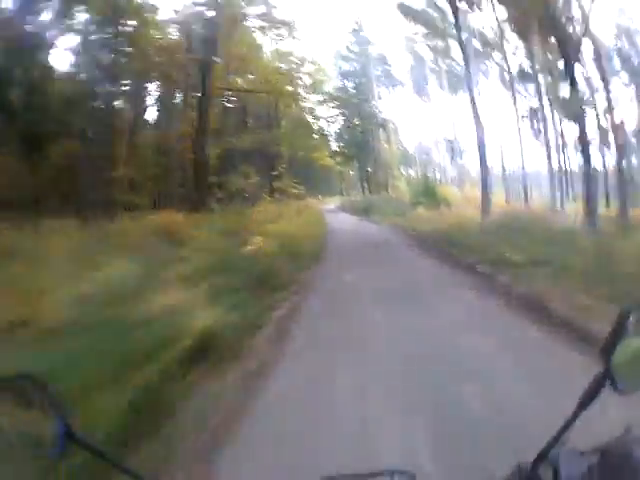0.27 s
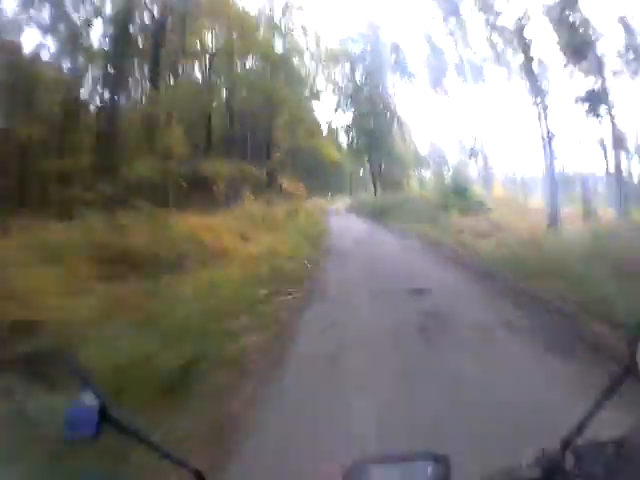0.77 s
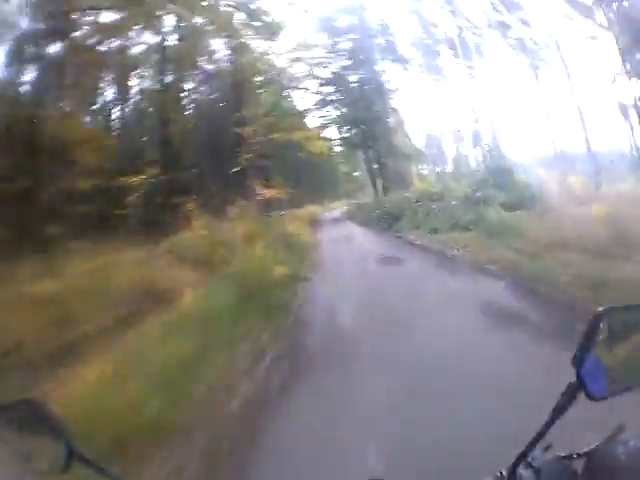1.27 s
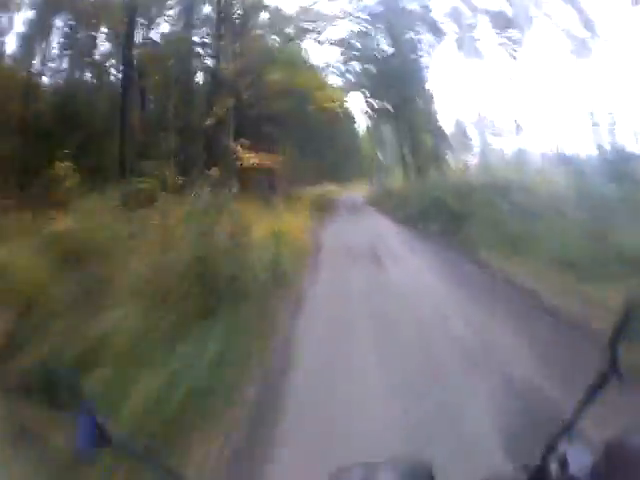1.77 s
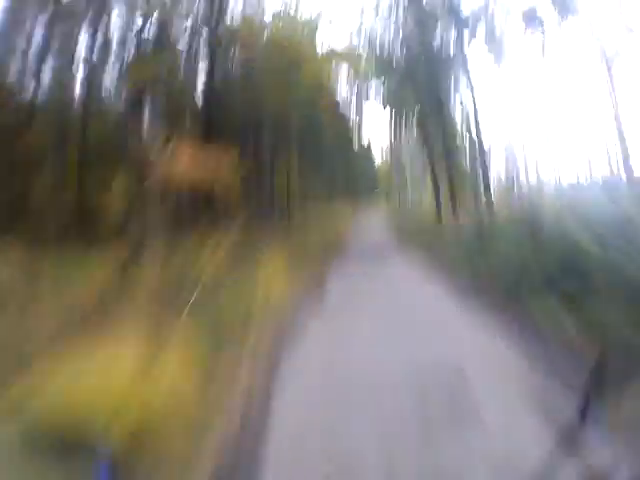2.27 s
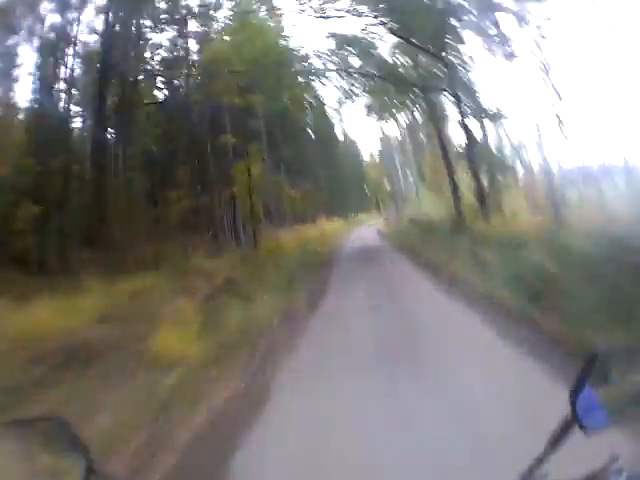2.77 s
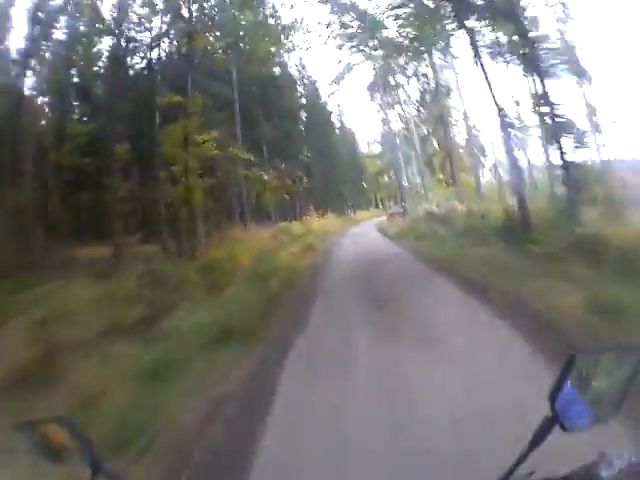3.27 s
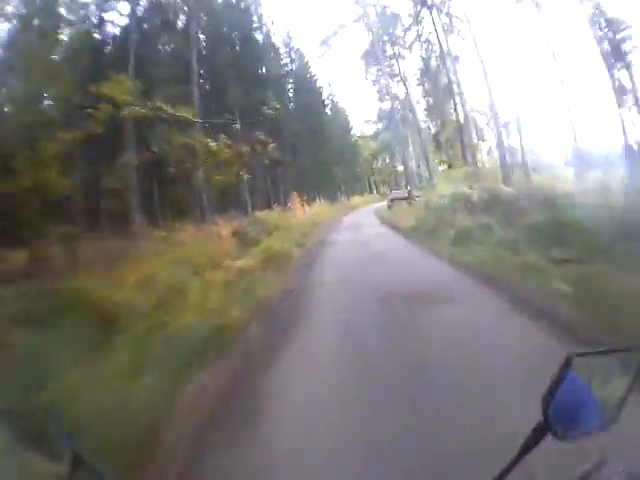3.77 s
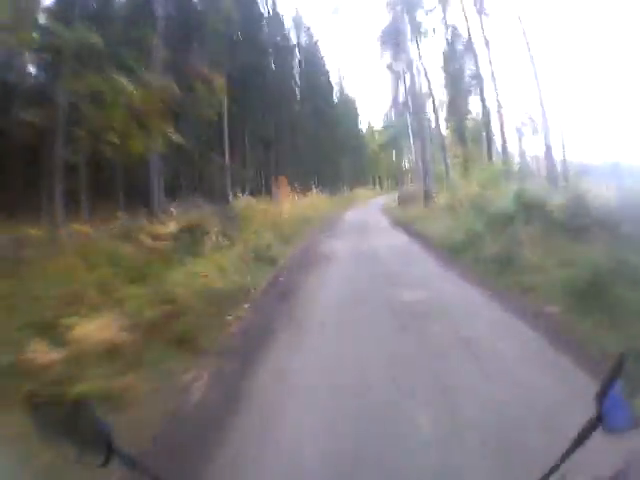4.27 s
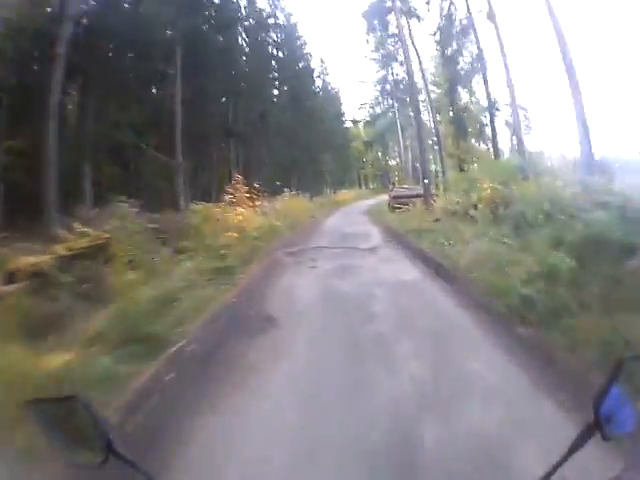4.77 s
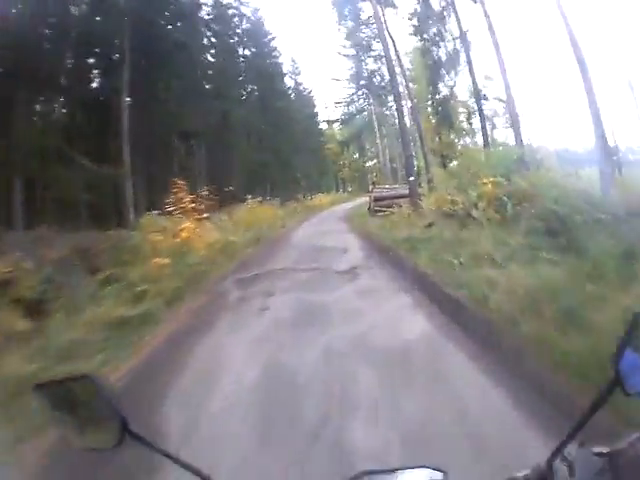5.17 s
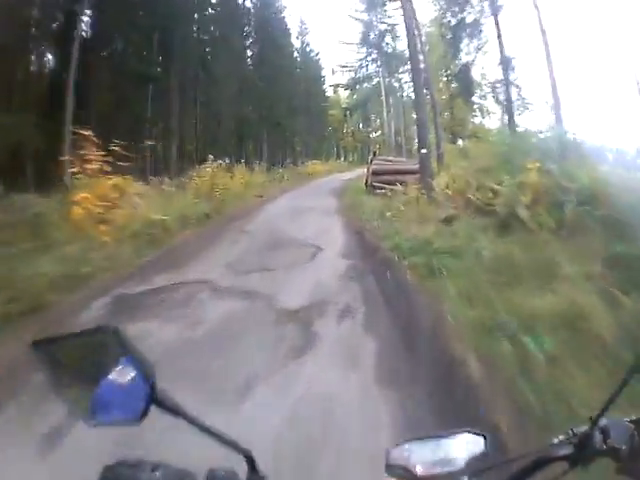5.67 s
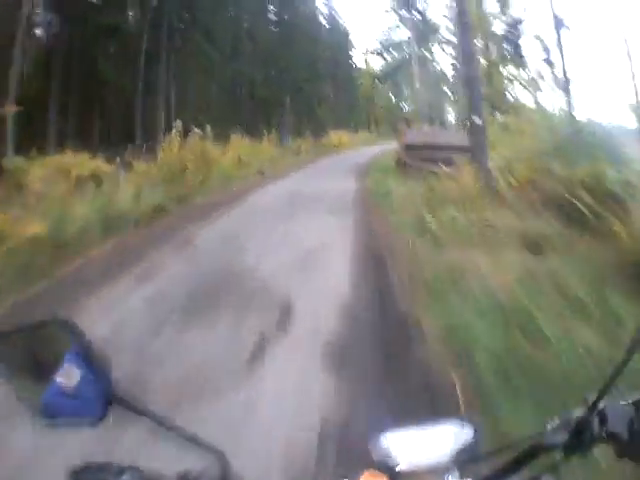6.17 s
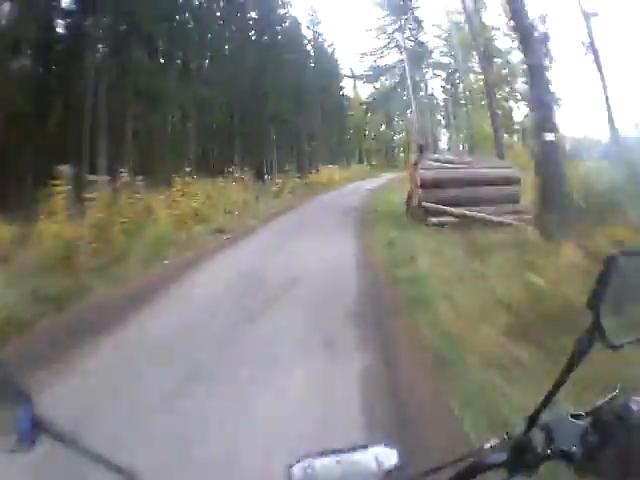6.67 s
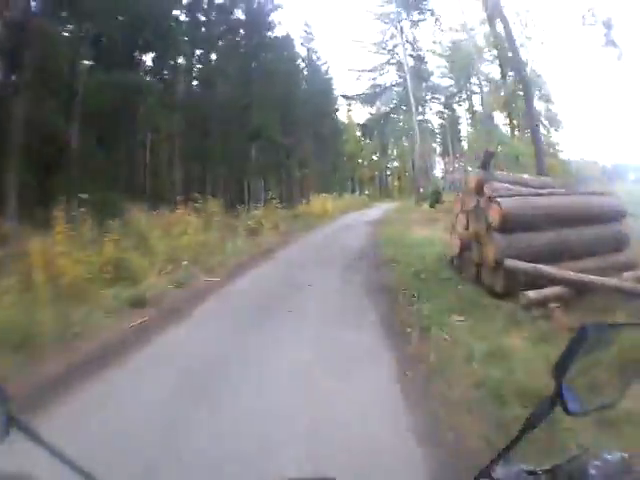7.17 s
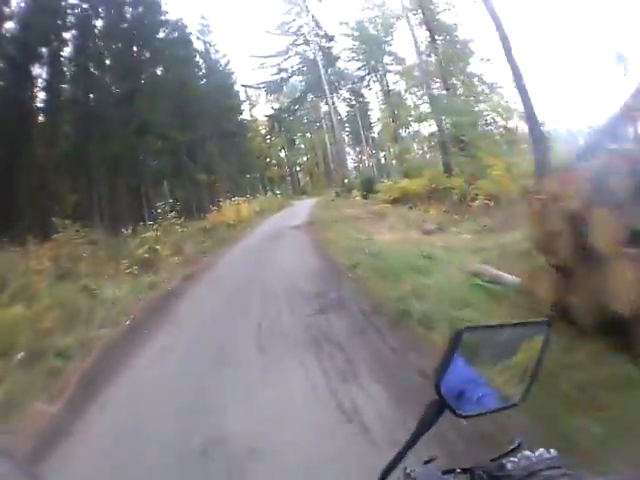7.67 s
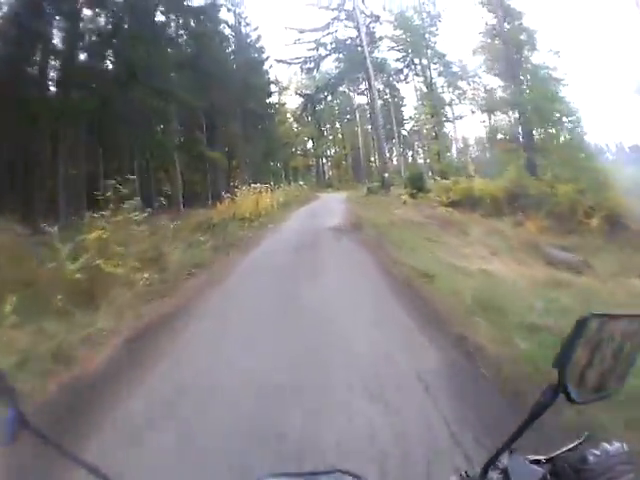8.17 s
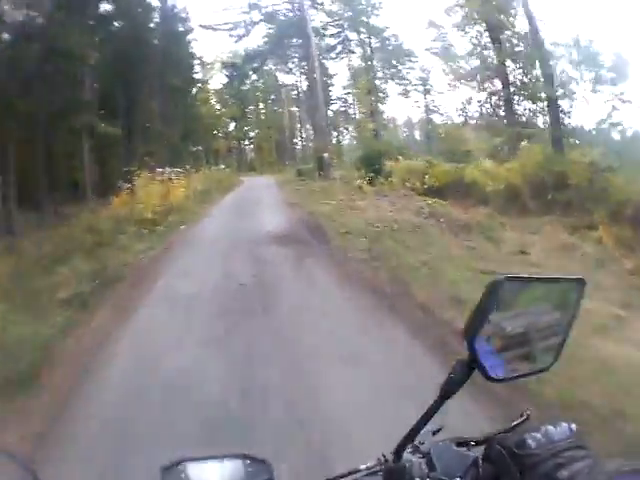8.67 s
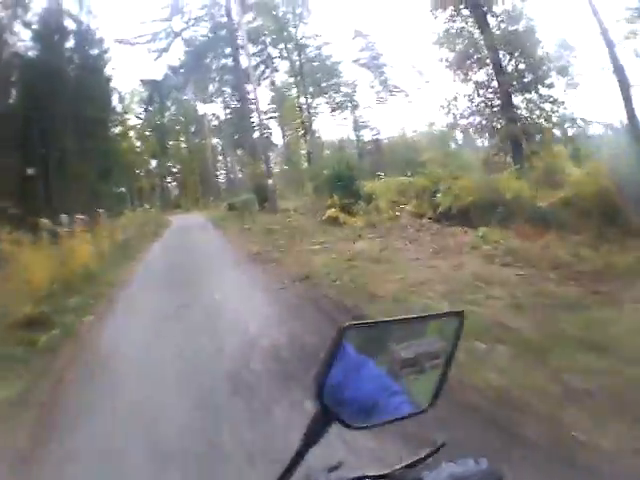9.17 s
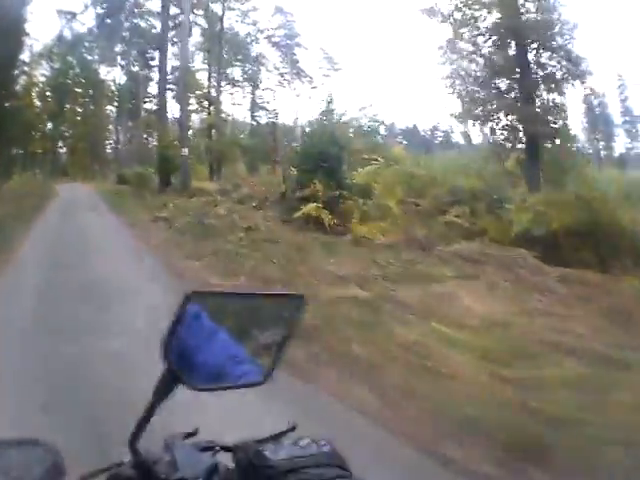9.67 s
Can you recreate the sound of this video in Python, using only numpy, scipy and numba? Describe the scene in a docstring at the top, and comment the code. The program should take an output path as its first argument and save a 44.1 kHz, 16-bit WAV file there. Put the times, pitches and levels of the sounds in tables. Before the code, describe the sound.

A microphone on the rider catches a single-cylinder quad bike on a rough forest road. From 0 to 3 seconds the engine drones fast and buzzy, creeping up in pitch, with dense steady rattle and hiss. Wind buffets low and bouncing wheels rumble; heavy thumps hit early, with a sharp crack at about 0.8 and more jolts near 1.7 and 2.1. Stones ping the bodywork around 2.4 and faintly at 3.1. From 3 the throttle closes and the pitch falls steeply to a slow, ragged, quieter chug near 5, as wind and clatter fade. Around 5.5 the engine picks up again, firmer and more even, with crisp metallic ticking once per firing. Pitch climbs gently to the end. A jolt lands at 6.5, a violent cluster of thuds and clicks at 7.15 to 7.35, another thump at 8.25. A low crank drone swells around 8, then eases at the end.

```python
"""Quad bike on a rough forest road

A single-cylinder quad bike slows and pulls away again, heard by a microphone on the rider.
Firings sound through the exhaust as a stack of tones, and the crank drones through the frame as one tone.
Valve gear, loose parts and gas rattle as noise bursts once a cycle, with ringing knocks under pull.
Potholes thump the mount, sharp noise clicks stand out, most of them at jolts, and stones ring the bodywork;
bouncing wheels and headwind rumble below.
"""
import sys
import numpy as np
from scipy import signal
from scipy.io import wavfile
from scipy.ndimage import uniform_filter1d
from numba import njit

SR = 44100
rng = np.random.default_rng(int(sys.argv[2]) if len(sys.argv) > 2 else 0)


def wav_out(sig):
    """Save sig, one row per channel (or a flat mono array), as 16-bit PCM at SR to the path in sys.argv[1]."""
    wavfile.write(sys.argv[1], SR, np.round(np.clip(np.atleast_2d(sig).T, -1, 1) * 32767).astype(np.int16))


N = 437891

# Engine speed: t/s, firing rate f/Hz
FIRING_RATE = [(0.0, 51.66), (0.33, 53.41), (0.52, 52.6), (0.74, 54.31), (0.89, 53.68), (1.15, 54.77),
               (1.42, 54.66), (1.65, 56.43), (1.8, 55.4), (2.16, 57.28), (2.27, 55.71), (2.54, 58.24),
               (2.6, 56.54), (2.9, 57.66), (3.06, 53.74), (3.18, 55.9), (3.39, 51.74), (3.54, 50.4),
               (3.68, 50.0), (3.79, 47.2), (4.03, 41.1), (4.3, 37.31), (4.55, 33.37), (4.8, 30.32),
               (4.95, 27.46), (5.1, 29.57), (5.3, 29.37), (5.5, 28.27), (5.65, 28.43), (6.25, 30.7),
               (6.4, 31.29), (6.6, 30.79), (6.8, 31.28), (7.0, 31.88), (7.2, 33.01), (7.4, 33.74),
               (7.55, 33.32), (7.8, 33.83), (8.11, 34.68), (8.26, 35.02), (8.83, 35.93), (8.9, 36.2),
               (9.18, 37.17), (9.32, 37.63), (9.52, 38.08), (9.93, 38.54)]
# How hard the engine works: t/s, exhaust level/dB, clatter level/dB
ENGINE_LOAD = [(0, -20, -40.5), (.5, -22, -41), (1.2, -20.5, -40.5), (2.88, -20.5, -39.5),
               (2.94, -28.5, -42), (3.05, -22, -43), (3.4, -23, -46), (3.5, -27.5, -45), (4.15, -25.5, -49),
               (4.85, -32, -54.5), (5.15, -30, -54.5), (5.24, -33, -55.5), (5.3, -34.5, -54.5),
               (5.5, -26, -51), (6.0, -23.5, -45.5), (6.3, -25, -46.5), (7.1, -27, -46.5),
               (7.22, -28, -45.5), (7.4, -28, -46.5), (7.75, -29.5, -46.5), (8.1, -27, -44.5),
               (8.45, -26, -45.5), (9.1, -26, -44.5), (9.3, -26.5, -46.5), (9.6, -25, -46),
               (9.93, -29, -47)]
# Ragged on a shut throttle, crisp knocks under pull: t/s, firing unevenness/0-1, steady share of rattle/0-1
RAGGEDNESS = [(0, .04, .9), (2.9, .04, .9), (3.0, .15, 1), (3.2, .06, 1), (3.45, .1, 1), (3.65, .3, 1),
              (5.2, .35, .7), (5.42, .03, .25), (9.93, .03, .25)]
# Throttle position: t/s, state (0 gather, 1 cruise, 2 overrun, 3 coast, 4 opening, 5 pickup, 6 pull,
# 7 strong pull; in between, a blend)
THROTTLE_STATE = [(0, 0), (.2, 0), (1.7, 1), (2.9, 1), (3.05, 1.2), (3.4, 1.25), (3.75, 2), (4.6, 3),
                  (5.05, 3), (5.2, 4), (5.42, 4), (5.65, 5), (6.25, 5), (6.45, 5.45), (7.0, 5.5), (8.3, 6),
                  (8.9, 6), (9.5, 7), (9.93, 7)]

# Exhaust note in each throttle state: multiple of the firing rate, relative level/dB
GATHER_NOTE = [(3, -18), (4, -21), (5, -8), (6, 0), (7, -12), (8, -12), (9, -23), (10, -13), (11, -21),
               (12, -25), (13, -29), (14, -24), (15, -22), (16, -32), (17, -24), (18, -36), (23, -40),
               (26, -30), (27, -38), (30, -42)]
CRUISE_NOTE = [(3, -14), (4, -12), (5, 0), (6, -3), (7, -11), (8, -18), (9, -20), (10, -10), (11, -16),
               (12, -16), (13, -25), (14, -21), (15, -22), (16, -26), (17, -28), (18, -38), (19, -31),
               (20, -33), (22, -38), (24, -29), (25, -29), (26, -37), (30, -44)]
OVERRUN_NOTE = [(3, -5), (4, -7), (5, -12), (6, -8), (7, 0), (8, -8), (9, -13), (10, -14), (11, -21),
                (13, -20), (16, -24), (24, -27), (27, -36)]
COAST_NOTE = [(3, -6), (4, -5), (5, -12), (6, -12), (7, -5), (8, 0), (9, -4), (10, -9), (11, -14),
              (12, -19), (13, -21), (14, -21), (15, -20), (16, -22), (24, -24), (30, -30)]
OPENING_NOTE = [(3, -6), (4, 0), (5, -3), (7, -11), (9, -13), (10, -11), (11, -3), (12, 0), (13, -5),
                (14, -10), (16, -15), (20, -20), (30, -24)]
PICKUP_NOTE = [(3, -14), (4, -10), (5, -11), (6, -13), (7, -18), (8, -14), (9, -8), (10, 0), (11, -4),
               (12, -3), (13, -12), (14, -12), (15, -17), (16, -20), (17, -23), (18, -32), (19, -32),
               (20, -31), (21, -32), (22, -28), (23, -28), (24, -26), (25, -23), (26, -21), (27, -26),
               (28, -28), (29, -29), (30, -30)]
PULL_NOTE = [(3, -18), (4, -9), (5, -16), (6, -14), (7, -10), (8, -5), (9, -8), (10, -15), (11, -18),
             (12, -21), (13, -18), (14, -18), (15, -21), (16, -25), (17, -29), (18, -27), (19, -25),
             (20, -26), (21, -27), (22, -28), (23, -26), (24, -23), (25, -25), (26, -28)]
STRONG_PULL_NOTE = [(3, -3), (4, 1), (5, -8), (6, -19), (7, -1), (8, -3), (9, -1), (10, -11), (11, -18),
                    (12, -11), (13, -7), (14, -8), (15, -19), (16, -17), (17, -14), (18, -14), (19, -14),
                    (20, -13), (21, -18), (24, -15), (25, -23), (28, -31)]
# Firing rate at which each state's note is listed, in state order: f/Hz
NOTE_LISTED_AT = [52.7, 56.6, 38.8, 32.8, 28.8, 30.17, 36.65, 38.1]
# The pulse leaves the pipe this late in the cycle; tones below the corner come earlier by up to this
PULSE_AT_CYCLES, PULSE_EARLY_CYCLES, PULSE_CORNER_HZ = .65, .4, 400

# Once-a-turn drone of the crank: t/s, level/dB
CRANK_LEVEL = [(0, -21), (.5, -20), (1, -22), (1.5, -19), (2.1, -23.5), (3.1, -20.5), (3.7, -25.5),
               (3.8, -39), (4, -27), (4.4, -25), (4.8, -26), (5.1, -22.5), (5.6, -23), (6, -30), (6.4, -44),
               (6.9, -23), (7.6, -23), (7.8, -22.5), (8, -15.5), (8.3, -19), (9.2, -19), (9.93, -30.5)]

# Parts that clatter once a cycle: f/Hz, width/Hz, relative level/dB, place of the burst's peak/cycles
GAS_BANDS = [(708, 230, -4, 0.72), (799.6, 21.4, -0.5, 0.6), (903, 58, -5, 0.63), (1394, 137, -7, 0.23),
             (630, 300, -9.5, 0.73)]
SHIELD_BANDS = [(1844, 60, -3.5, 0.34), (1976, 61, -5, 0.49)]
PANEL_BANDS = [(2124, 240, -3, 0.89), (2330, 250, -8.5, 0.6)]
VALVE_BANDS = [(2520, 200, -1.5, 0.83), (3156, 180, -2, 0.63), (3830, 290, 2, 0.47), (4262, 76, 0.5, 0.62),
               (4686, 250, -3, 0.25), (5170, 150, -12, 0.48), (6300, 360, -9.5, 0.32),
               (6700, 100, -14.5, 0.42), (7850, 270, -12.5, 0.31), (8700, 530, -24, .5),
               (10620, 800, -14, 0.18), (13100, 800, -13, 0.42), (14900, 500, -35, .5)]
# Parts that rattle on at any throttle, and a steady broad hiss above 5 kHz: same columns
FRAME_AND_HISS_BANDS = [(526, 18, -2, 0.57), (704, 220, -6, 0.65), (2790, 200, -16, 0.24),
                        (3890, 270, -13, 0.94), (7000, 3000, -26, .5), (13000, 4000, -24, .5)]
# How each group follows the clatter: (dB over it at cruise, dB gained for each dB of clatter)
CRUISE_CLATTER_DB = -41
GAS_RULE, SHIELD_RULE, PANEL_RULE = (4.6, 1), (4, 0.94), (-6, 1)
VALVE_RULE, FRAME_AND_HISS_RULE = (0.074, 1.48), (-3.5, 0.13)
# Firing rates at which panel and shield respond most, and how narrowly
PANEL_BUZZ_HZ, PANEL_BUZZ_WIDTH_HZ, PANEL_BUZZ_DB = 38.8, 2.4, 6
SHIELD_RINGS_HZ, SHIELD_RINGS_WIDTH_HZ, SHIELD_CALMS_DB = 30.6, 3.3, -9

# Knocks once a cycle under pull: f/Hz, relative level/dB, time to fade by 60 dB t/s
TAPPET_MODES = [(4240, 0, .05), (4330, -5, .03), (5120, -8, .03)]
SHIELD_KNOCK_MODES = [(1880, 0, .05), (1950, -3, .04)]
PANEL_KNOCK_MODES = [(2250, 0, .045), (2370, -4, .035)]
# Each knock's place in the cycle, then its gain over the clatter before the engine's state fades it
TAPPET_AT, SHIELD_KNOCK_AT, PANEL_KNOCK_AT = .33, .48, .79
TAPPET_DB, SHIELD_KNOCK_DB, PANEL_KNOCK_DB = 11.5, 17, 19
KNOCK_SCATTER_DB = 1.5

# The wheels meet a bump and bounce on their tyres: t/s, level/dB, held t/s
WHEEL_BUMPS = [(.14, -15.5, 0.051), (.55, -17, 0.073), (.8, -17, 0.12), (.98, -10.5, 0.069),
               (1.36, -23.5, 0.25), (1.71, -16.5, 0.071), (1.91, -16, 0.018), (2.07, -18, 0.027),
               (2.33, -9.5, 0.031), (2.51, -8.5, 0.075), (2.79, -14, 0.016), (3.03, -9.5, 0.017),
               (3.15, -16.5, 0.12), (3.46, -16.5, 0.068), (3.81, -7.5, 0.015), (3.95, -24, 0.022),
               (4.07, -13.5, 0.11), (4.29, -18.5, 0.051), (4.47, -16, 0.097), (4.6, -12.5, 0.09),
               (4.86, -11, 0.047), (5.1, -15.5, 0.062), (5.38, -12, 0.01), (5.48, -22, 0.16),
               (5.9, -20.5, 0.03), (6.08, -21, 0.18), (6.41, -15, 0.13), (6.58, -19, 0.036),
               (6.81, -21.5, 0.025), (7.1, -19, 0.053), (7.19, -6.5, 0.08), (8.13, -20, 0.16),
               (8.5, -10, 0.033), (9.21, -22, 0.029), (9.43, -21, 0.015), (9.77, -33, 0.063)]
BUMP_RISE_S, BUMP_SETTLE_S, SMOOTH_ROAD_DB = 0.12, 0.035, -25
# Headwind buffeting the microphone: t/s, gain on all the wind bands/dB
WIND_GAIN = [(0, -14), (.6, -17.5), (1.05, -13.5), (1.3, -19.5), (1.65, -14), (2.3, -13.5), (2.75, -16),
             (3.65, -16), (3.85, -17), (4.6, -25.5), (5.7, -29.5), (6.5, -18.5), (7.3, -23.5), (9.4, -21.5),
             (9.62, -20), (9.93, -19)]

# How the mount rings after a jolt: f/Hz, relative level/dB, time to fade by 60 dB t/s
MOUNT_MODES = [(26, 1.5, 0.071), (58.9, 8.5, 0.18), (114.2, -1.5, 0.11), (165, -23, 0.031)]
# Jolts through the frame: t/s, peak level/dB, sharpness (extra level on the upper modes)/dB
FRAME_JOLTS = [(0.115, -0.5, 2), (0.829, 5, 11.5), (0.925, -2, 3), (0.984, -5, 7), (1.701, 1.5, 6.5),
               (1.856, -2, 7), (2.131, 1, 11.5), (2.493, -1.5, -5), (2.605, -6.5, -8), (2.693, -3, -4),
               (2.997, -10, -7), (3.074, -8, -15), (3.169, -2.5, -18), (3.251, -8, -19), (3.429, -11, -25),
               (4.001, -3, -24), (4.34, -8, 10), (5.161, -6, -17), (5.174, -7.5, 4), (5.331, -17, 17),
               (6.124, -8.5, -16), (6.41, -9, -4), (6.515, 2, 5.5), (7.149, 5, 5.5), (7.174, 0.5, -11),
               (7.191, -0.5, 24), (7.211, 0.5, 16), (7.247, 0, 12), (7.261, -6, -15), (7.323, -2, 5),
               (7.35, -9, -9), (7.531, -2, 10.5), (8.242, 6, 6), (8.376, -4, -9)]
# Sharp clicks, most as jolts overload the microphone: t/s, level before fading/dB, band centre f/Hz
OVERLOAD_CLICKS = [(.832, -20, 8740), (2.15, -39, 9000), (2.426, -45, 6000), (2.509, -37, 11000),
                   (2.585, -39, 11000), (2.605, -45, 12200), (2.802, -29, 12000), (6.52, -41, 9000),
                   (7.154, -33, 9010), (7.188, -40, 9000), (7.198, -34, 9000), (7.217, -43, 9000),
                   (7.222, -32, 7000), (7.262, -41, 9000), (7.268, -35, 9000), (7.283, -38, 8960),
                   (8.248, -38, 9000)]
CLICK_WIDTH_HZ, CLICK_T60_S = 12000, 0.0074
# A stone strikes the bodywork: t/s, peak level/dB
STONE_STRIKES = [(2.3703, -13), (2.3745, -14), (3.0772, -20), (3.0787, -32)]
# What a stone sets ringing: f/Hz, relative level/dB, time to fade by 60 dB t/s
BODYWORK_MODES = [(1800, -4, .05), (1920, -6, 0.1), (2040, 4, 0.057), (2460, -1, 0.032), (2715, 2, 0.025),
                  (3250, -2, 0.04), (3750, -3, .035), (4250, -2, 0.04), (6300, -20, .015), (8100, -19, .02)]

# Gain ducking at the microphone; nothing sounds above TOP_HZ
DUCK_OVER_DB, DUCK_RATIO, DUCK_S, DUCK_LATE_S = -9, 2.9, 0.048, 0.028
TOP_HZ = 15750


def undb(db):
    """Turn a level in dB into a plain gain."""
    return 10 ** (np.asarray(db) / 20)


def unit(x):
    """Scale a sound to an average (rms) strength of 1."""
    return x / np.sqrt(np.mean(x ** 2))


def curves(table):
    """Join each column after the time column by straight lines, one value a sample."""
    s, *columns = np.transpose(table)
    return [np.interp(np.arange(N) / SR, s, c) for c in columns]


@njit
def band_pass(x, hz, width):
    """State-variable filter that keeps a band around hz, with gain 1 at the centre."""
    y, band, low = np.empty(len(x)), 0., 0.
    g, k = np.tan(np.pi * hz / SR), width / hz
    for i in range(len(x)):
        # the tiny offset keeps the filter from slowing down on near-zero numbers
        v = (band + g * (x[i] + 1e-18 - low)) / (1 + g * (g + k))
        band, low, y[i] = 2 * v - band, low + 2 * g * v, k * v
    return y


def walk(rate):
    """A smooth random wander: levels held for 1 / rate seconds, smoothed twice; spread 1."""
    k = int(SR / rate)
    held = np.repeat(rng.standard_normal(N // k + 1), k)
    smooth = uniform_filter1d(uniform_filter1d(held, k), k)
    return unit(smooth[:N])


def ringing(modes, samples, attack_s):
    """A struck part: sine tones that start within attack_s and die away, each at its own pace."""
    t = np.arange(samples) / SR
    tones = sum(undb(db) * np.sin(2 * np.pi * hz * t) * 1000 ** (-t / t60) for hz, db, t60 in modes)
    return tones * (1 - np.exp(-t / attack_s))


def near(hz, peak_hz, width_hz):
    """Resonance: 1 when the firing rate is at peak_hz, falling away to both sides."""
    return 1 / (1 + ((hz - peak_hz) / width_hz) ** 2)


def note_db(k, hz, state):
    """Level of multiple k, blended between throttle states; pipe resonances stay put in some of them."""
    notes = (GATHER_NOTE, CRUISE_NOTE, OVERRUN_NOTE, COAST_NOTE,
             OPENING_NOTE, PICKUP_NOTE, PULL_NOTE, STRONG_PULL_NOTE)
    db = 0
    for n, (table, listed_hz) in enumerate(zip(notes, NOTE_LISTED_AT)):
        multiple, level_db = np.transpose(table)
        share = np.clip(1 - abs(state - n), 0, 1)
        # off throttle, opening and under pull, the upper multiples are looked up by frequency
        keeps_to_pipe = n in (2, 3, 4, 6, 7) and k > 4
        place = k * hz / listed_hz if keeps_to_pipe else k
        db = db + share * np.interp(place, multiple, level_db, right=-45)
    return db


def exhaust(hz, cycles, rough):
    """Firing pulses in the pipe: tones at multiples 3 to 30 of the firing rate, balanced by throttle."""
    at = np.arange(0, N, 256)  # the slow balance is worked out only every 256 samples
    state = curves(THROTTLE_STATE)[0][at]
    # weak mixtures burn late and unevenly, cycle by cycle
    chance = rng.standard_normal((2, 600))
    late, size = (np.interp(cycles, np.arange(600), c) * rough for c in chance)
    out = np.zeros(N)
    for k in range(3, 31):
        db = np.interp(np.arange(N), at, note_db(k, hz[at], state))
        # the pipe smears the pulse: low multiples arrive first
        corners = k * hz / PULSE_CORNER_HZ
        lead = .08 * late - PULSE_AT_CYCLES + PULSE_EARLY_CYCLES * np.tanh(corners) / corners
        # a reflection half a cycle behind turns the odd multiples aside
        lead = lead + .14 * (k % 2) / k
        out += undb(db + 1.2 * walk(4)) * np.cos(2 * np.pi * k * (cycles + lead))
    even = out / np.sqrt(uniform_filter1d(out ** 2, SR // 4))
    return even * undb(curves(ENGINE_LOAD)[0] + 1.0 * walk(8) + 6 * size)


def crank_drone(cycles):
    """The crank shakes the frame once a turn, which is twice a firing cycle."""
    level_db = curves(CRANK_LEVEL)[0] + 2.2 * walk(9)
    return np.sqrt(2) * np.cos(4 * np.pi * cycles) * undb(level_db)


def clatter(parts, cycles, steady):
    """Noise bands with a burst once a cycle, harder or softer each time, over a steady share; rms 1."""
    out = 0
    for f, width, db, place in parts:
        turn = cycles + 1 - place + .13  # the burst peaks .13 cycle after it starts
        phase = turn % 1
        burst = 1.4 * phase / .13 * np.exp(1 - phase / .13)
        size = undb(0.61 * rng.standard_normal(600))[turn.astype(int)]
        share = steady * (1 + 4 * (f > 5800))  # the far treble is mostly steady gas hiss
        shaken = (share + size * burst) / (share + .5) * rng.standard_normal(N)
        gain = undb(db + .9 * walk(8)) / np.sqrt(width)
        out = out + gain * band_pass(shaken, float(f), float(width))
    return unit(out)


def knock(cycles, modes, place):
    """A part struck once a cycle rings sharply, now and then accented."""
    at = np.flatnonzero(np.diff(np.floor(cycles + 1 - place)))
    blows = np.zeros(N)
    blows[at] = undb(KNOCK_SCATTER_DB * (rng.exponential(size=600)[:len(at)] - 2))
    return signal.fftconvolve(blows, ringing(modes, 2048, .0015))[:N]


def rattle_and_knocks(hz, cycles, steady):
    """Gas, shield, panel, valves, frame and hiss, with knocks under pull, all scaled by each firing."""
    over_db = curves(ENGINE_LOAD)[1] - CRUISE_CLATTER_DB

    def follow(rule):
        """Gain of a group as the clatter rises and falls."""
        return undb(CRUISE_CLATTER_DB + rule[0] + rule[1] * over_db)

    loose = 1 - steady
    buzz = loose * near(hz, PANEL_BUZZ_HZ, PANEL_BUZZ_WIDTH_HZ)
    rings = loose * near(hz, SHIELD_RINGS_HZ, SHIELD_RINGS_WIDTH_HZ)

    rattle = clatter(GAS_BANDS, cycles, steady) * follow(GAS_RULE)
    rattle += clatter(SHIELD_BANDS, cycles, steady) * follow(SHIELD_RULE) * undb(SHIELD_CALMS_DB * loose)
    panel = clatter(PANEL_BANDS, cycles, steady * (1.5 - buzz))
    rattle += panel * follow(PANEL_RULE) * undb(PANEL_BUZZ_DB * buzz)
    rattle += clatter(VALVE_BANDS, cycles, steady) * follow(VALVE_RULE)
    rattle += clatter(FRAME_AND_HISS_BANDS, cycles, steady) * follow(FRAME_AND_HISS_RULE)

    # crisp knocks fade as the rattle turns steady
    knocks = knock(cycles, TAPPET_MODES, TAPPET_AT) * undb(TAPPET_DB) * loose ** 2
    knocks += knock(cycles, SHIELD_KNOCK_MODES, SHIELD_KNOCK_AT) * undb(SHIELD_KNOCK_DB) * rings * loose
    knocks += knock(cycles, PANEL_KNOCK_MODES, PANEL_KNOCK_AT) * undb(PANEL_KNOCK_DB) * buzz

    # each firing shakes all parts alike
    force = undb(1.1 * (1.3 - steady) * rng.standard_normal(600)[cycles.astype(int)])
    return (rattle + follow((0, 1)) * knocks) * force * undb(.6 * walk(6))


def engine():
    """One firing every two crank turns sets the pace of exhaust, crank drone, rattle and knocks."""
    hz = curves(FIRING_RATE)[0]
    rough, steady = curves(RAGGEDNESS)
    cycles = np.cumsum(hz) / SR
    return exhaust(hz, cycles, rough) + crank_drone(cycles) + rattle_and_knocks(hz, cycles, steady)


def bump_size():
    """Size of the wheels' swing: rises, holds, then dies away to that of smooth road."""
    t, size = np.arange(N) / SR, undb(SMOOTH_ROAD_DB)
    for s, db, held in WHEEL_BUMPS:
        rise = np.clip(1 + (t - s) / BUMP_RISE_S, 0, 1)
        fall = np.exp(-np.clip(t - s - held, 0, 3) / BUMP_SETTLE_S)
        size = size + undb(db) * rise ** 2 * fall
    return size


def wheel_bounce():
    """Wheels bounce on their tyres: noise narrowed to near 16 Hz."""
    swing = band_pass(band_pass(rng.standard_normal(N), 18.0, 10.4), 14.14, 11.0)
    # the swing is irregular in time but its size follows the road
    even = swing / np.sqrt(uniform_filter1d(swing ** 2, SR // 6))
    return even * bump_size()


def headwind():
    """Wind buffets the microphone: low bands of noise that swell together in gusts."""
    gust_db = 0.19 * walk(21)
    wind = np.zeros(N)
    # f/Hz, width/Hz, relative level/dB
    for f, width, db in [(39.8, 54.0, -19.5), (76.0, 64.0, -9), (132.4, 82.0, -16.0),
                         (285.0, 124.0, -17), (468.0, 610.0, -20.5)]:
        band = band_pass(band_pass(rng.standard_normal(N), f, width), f, width)
        wind += undb(db + gust_db) * unit(band)
    return wind * undb(curves(WIND_GAIN)[0])


def jolts():
    """A few milliseconds of push sets the mount ringing."""
    out, t = np.zeros(N + SR), np.arange(SR // 2) / SR
    # the mount goes slack for an instant, then slams
    slam = np.hanning(int(0.0049 * SR))
    push = np.r_[-.3 * slam, slam]
    for s, db, sharp_db in FRAME_JOLTS:
        ring = np.zeros(len(t))
        for f, mode_db, t60 in MOUNT_MODES:
            gain = undb(mode_db + sharp_db * (f > 90))
            ring += gain * np.cos(2 * np.pi * f * t) * 1000 ** (-t / t60)
        blow = signal.fftconvolve(ring, push)[:len(t)]
        i = int(s * SR) - len(slam)
        out[i:i + len(t)] += undb(db) * blow / blow.max()
    return out[:N]


def clicks():
    """Sharp clicks, most as jolts overload the microphone: short bursts of noise in one broad band each."""
    out, t, width = np.zeros(N), np.arange(4096) / SR, float(CLICK_WIDTH_HZ)
    for s, db, hz in OVERLOAD_CLICKS:
        i = int(s * SR)
        noise = rng.standard_normal(len(t))
        band = band_pass(band_pass(noise, float(hz), width), float(hz), width)
        out[i:i + len(t)] += undb(db) * unit(band) * 1000 ** (-t / CLICK_T60_S)
    return out


def stones():
    """Each stone's strike sets the same bodywork tones ringing."""
    out = np.zeros(N)
    ring = ringing(BODYWORK_MODES, 4096, .0005)
    for s, db in STONE_STRIKES:
        i = int(s * SR)
        out[i:i + len(ring)] += undb(db) * ring / ring.max()
    return out


def scene():
    """Everything reaches one microphone."""
    return (engine() + wheel_bounce() + headwind() + jolts() + clicks() + stones())[None]


def record(dry):
    """Loud moments duck the gain a little late, the highest peaks clip, and the top is cut."""
    low_cut = signal.sosfilt(signal.butter(1, 4, "high", fs=SR, output="sos"), dry)
    loud = np.sqrt(uniform_filter1d(low_cut ** 2, int(DUCK_S * SR), axis=1))
    loud = np.roll(loud, int(DUCK_LATE_S * SR), axis=1)
    ducked = low_cut * np.minimum(1, undb(DUCK_OVER_DB) / loud) ** (1 - 1 / DUCK_RATIO)
    clipped = np.clip(ducked, -.99, .99)
    top_cut = signal.ellip(12, .1, 55, TOP_HZ, fs=SR, output="sos")
    return signal.sosfilt(top_cut, clipped)


dry = scene()
out = record(dry)
wav_out(out)
```